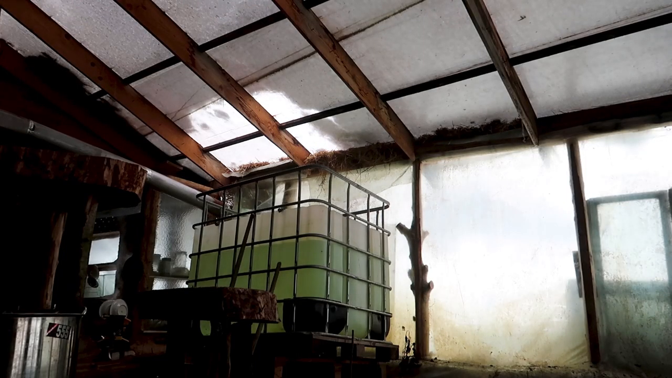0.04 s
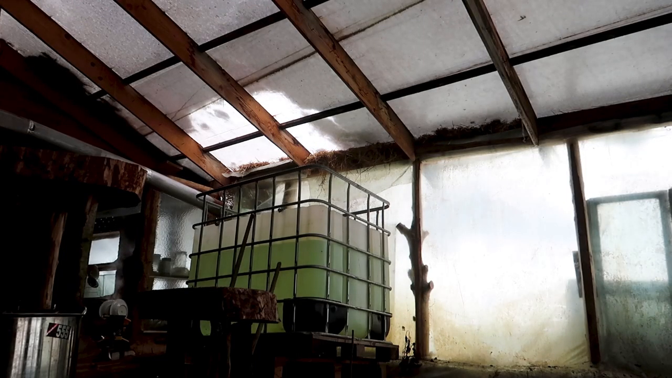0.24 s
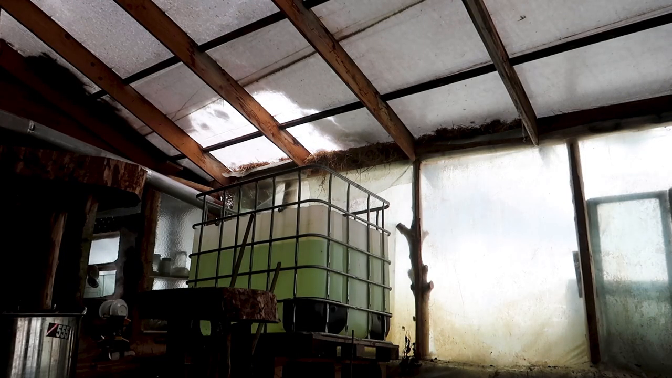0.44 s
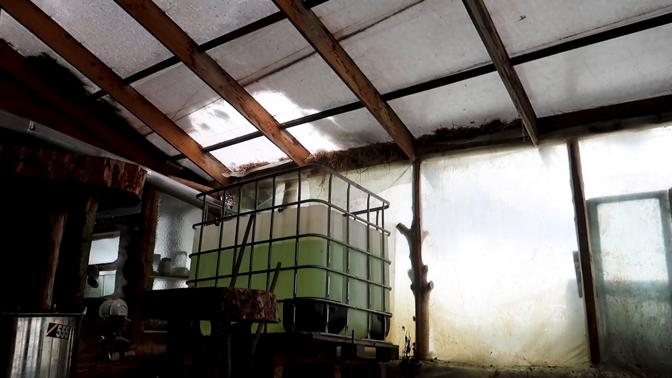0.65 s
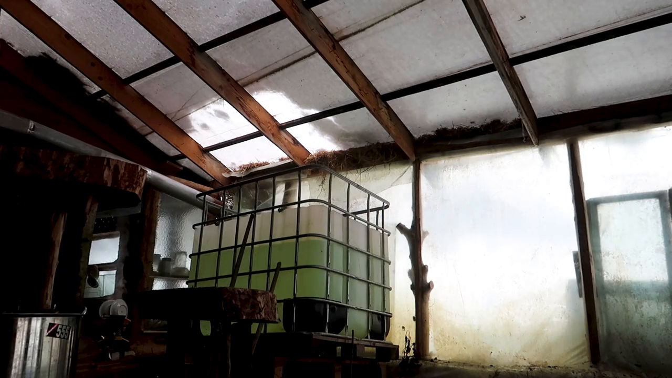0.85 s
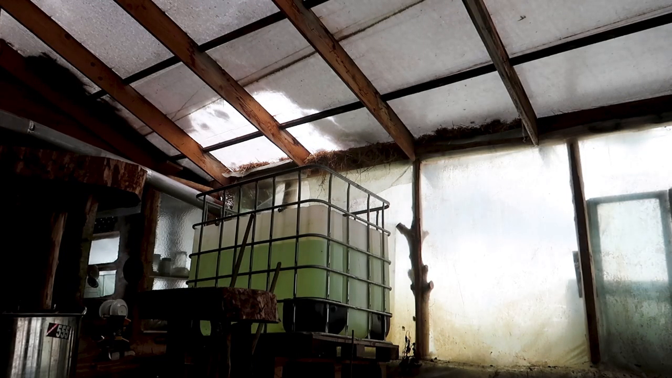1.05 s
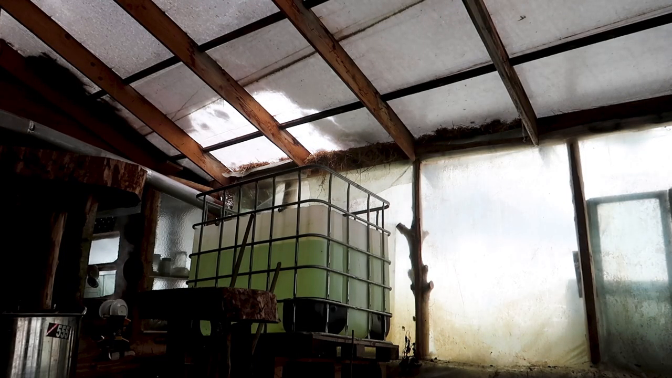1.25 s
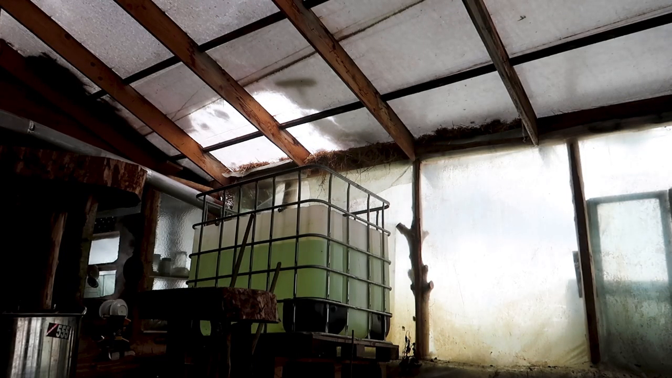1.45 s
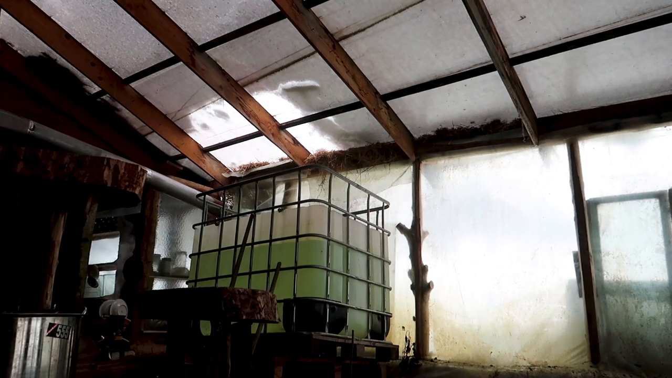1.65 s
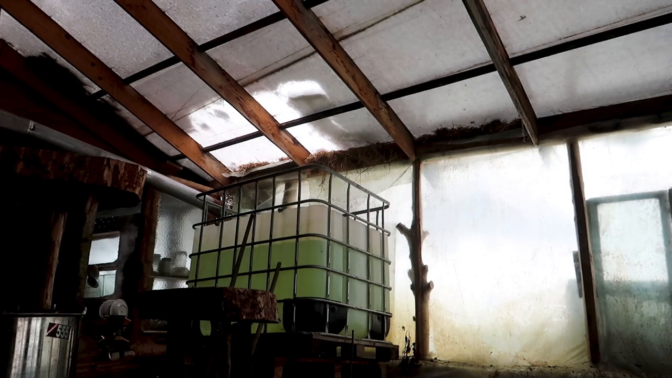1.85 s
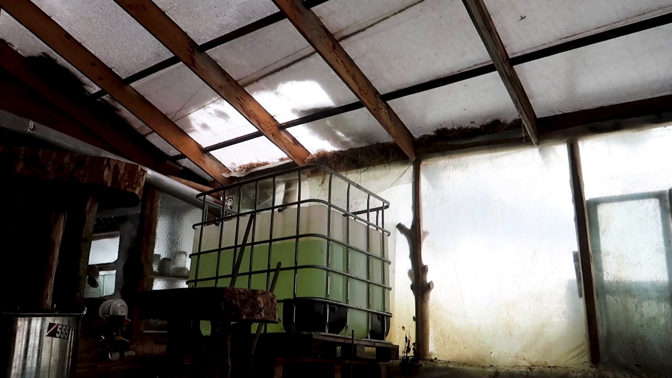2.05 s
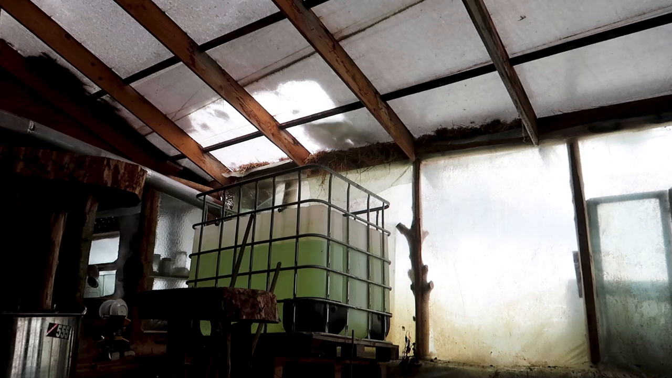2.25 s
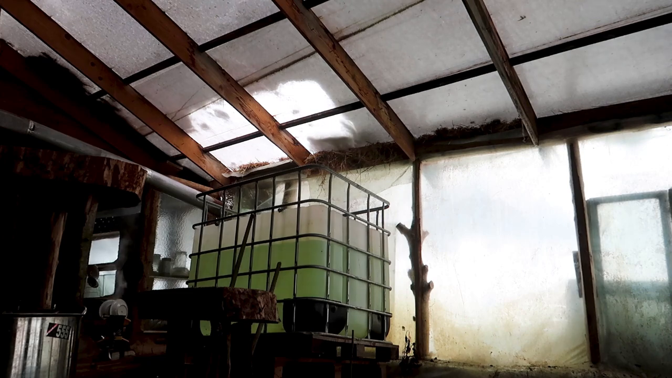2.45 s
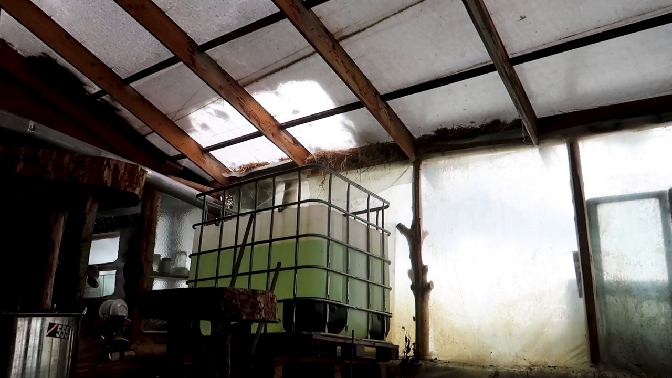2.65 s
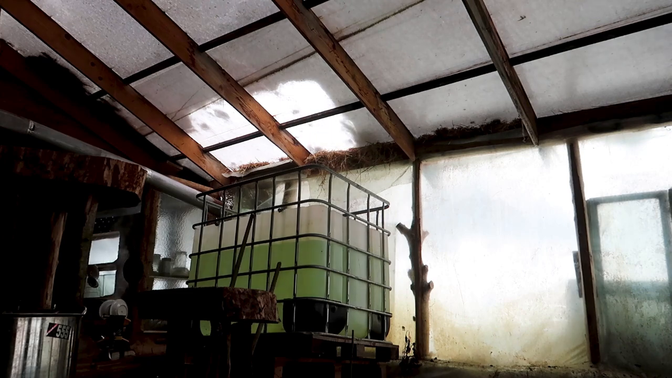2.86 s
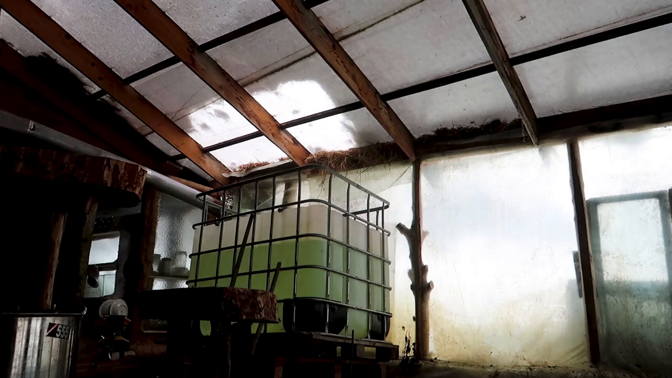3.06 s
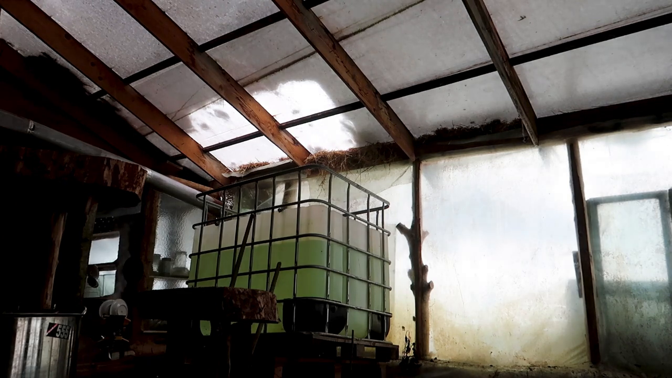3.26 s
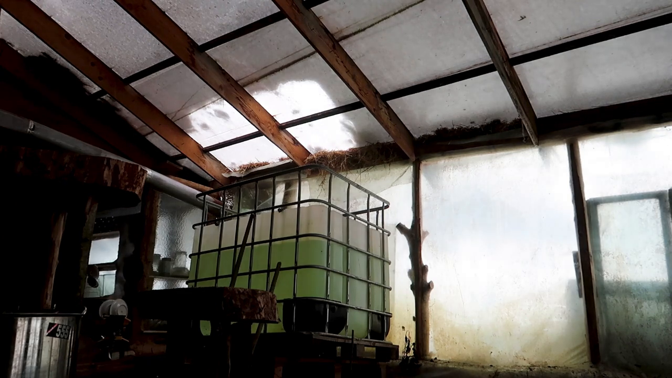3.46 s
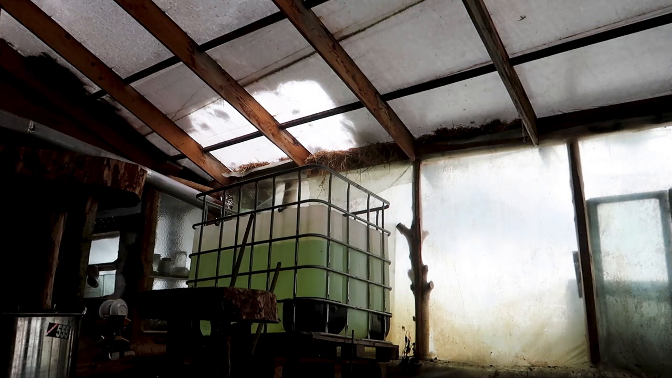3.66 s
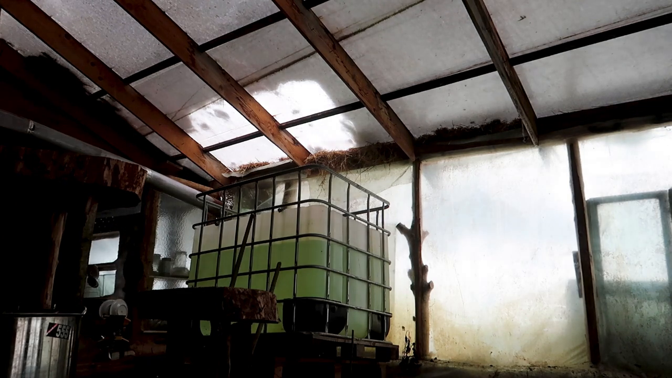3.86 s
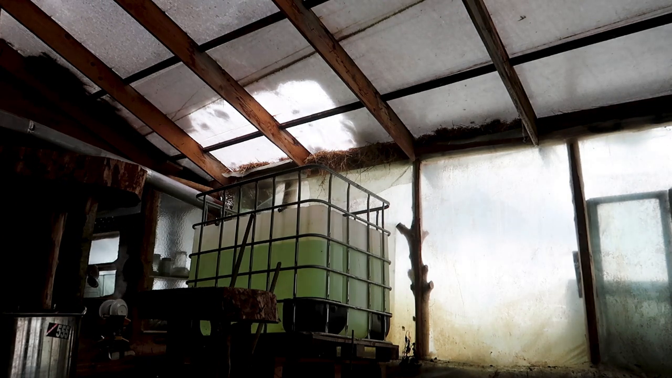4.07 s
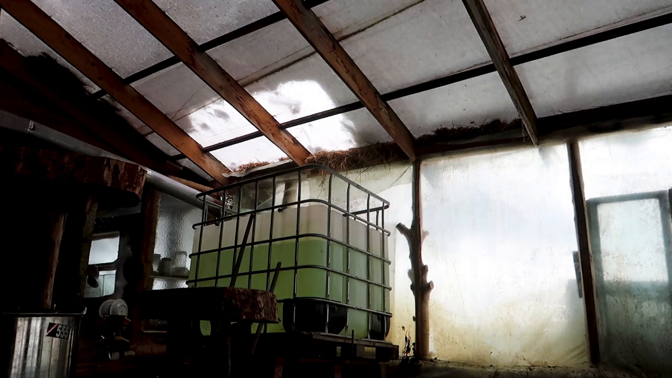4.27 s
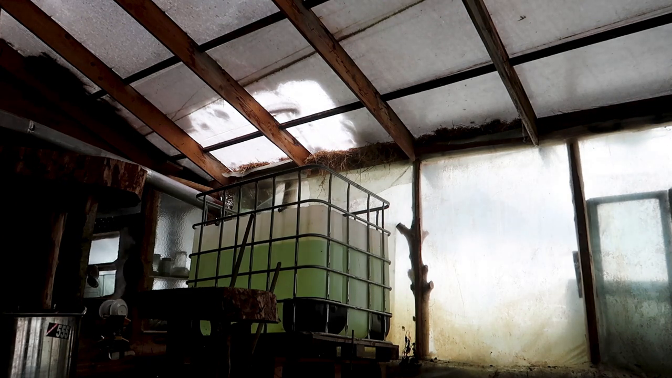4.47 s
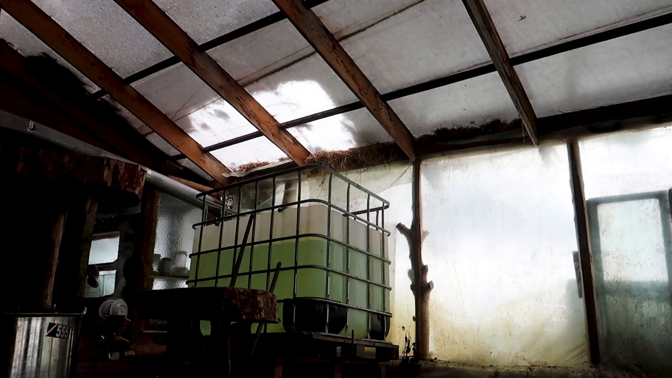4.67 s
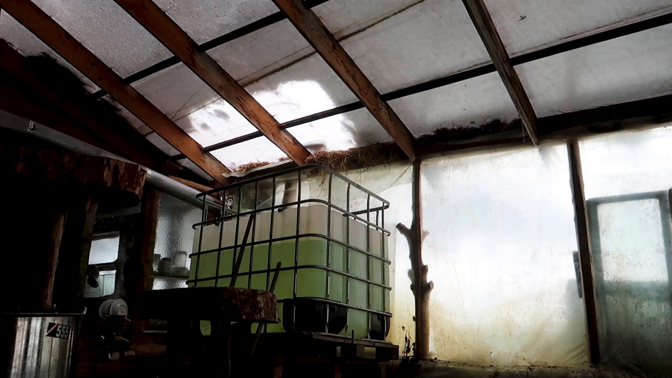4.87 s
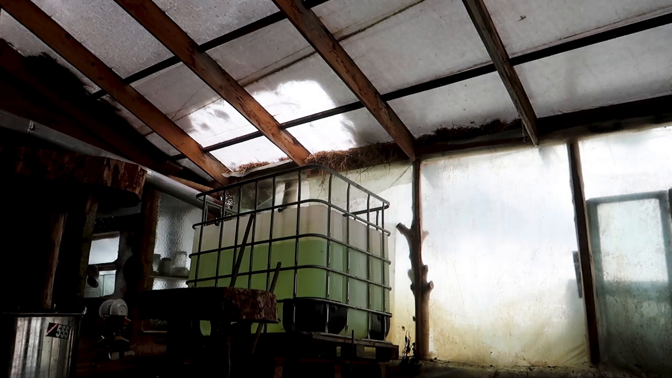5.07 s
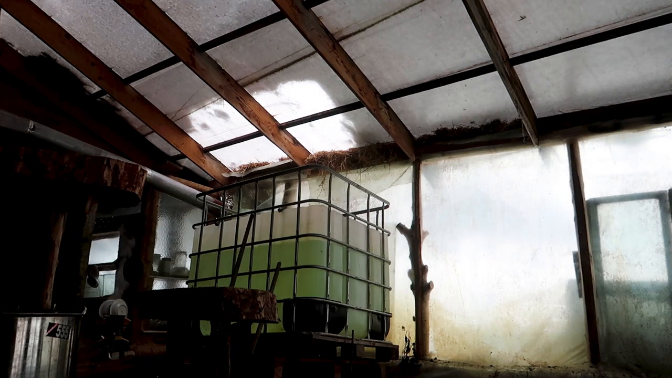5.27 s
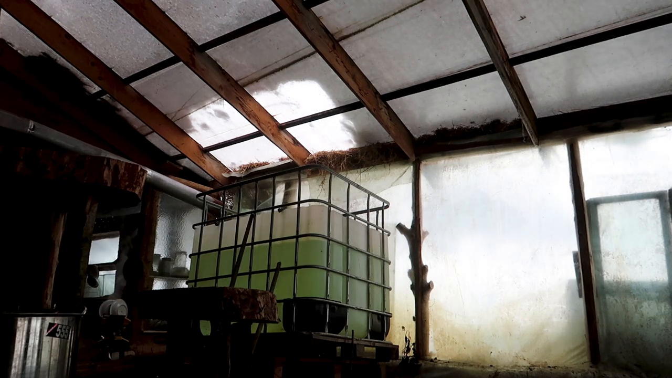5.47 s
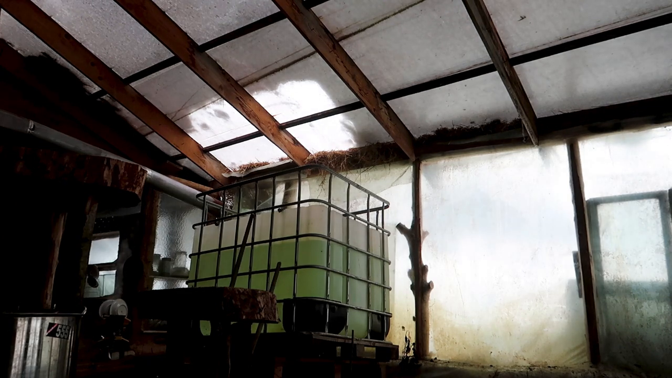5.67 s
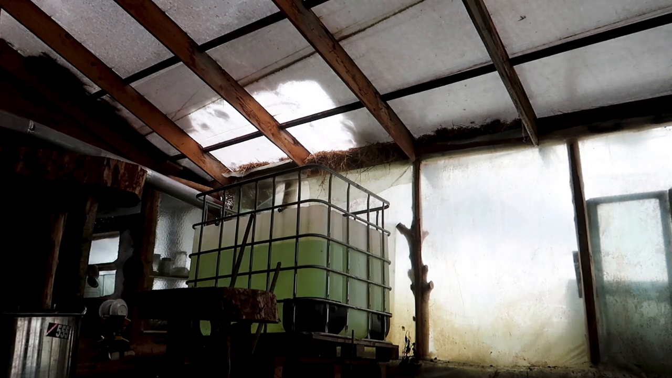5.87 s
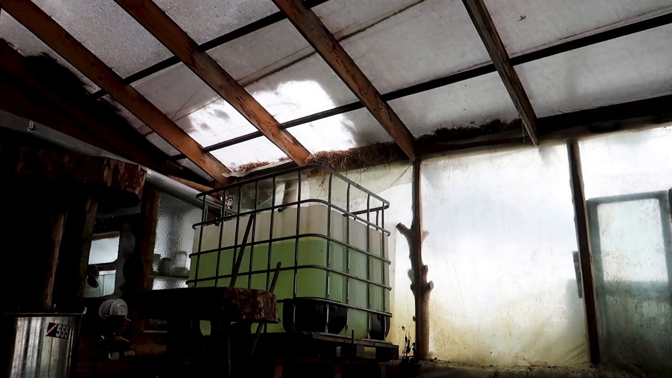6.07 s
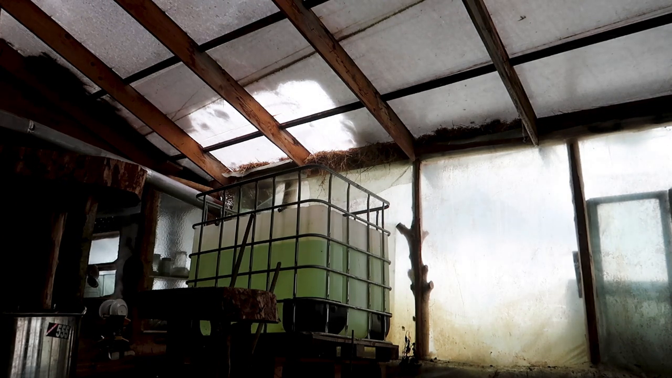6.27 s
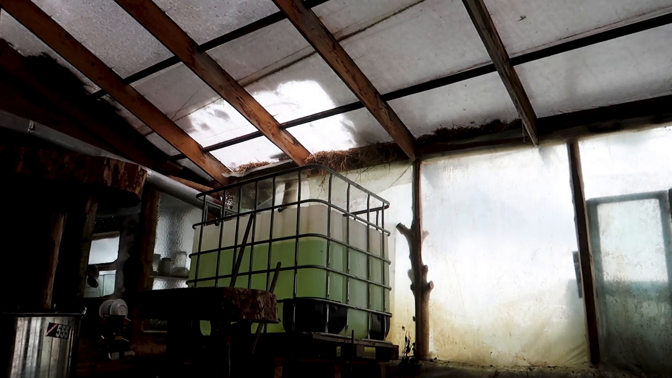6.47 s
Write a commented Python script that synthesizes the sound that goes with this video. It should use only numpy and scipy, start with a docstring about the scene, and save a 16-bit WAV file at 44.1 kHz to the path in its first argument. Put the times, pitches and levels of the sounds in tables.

```python
"""Inside a lean-to greenhouse, under a plastic roof from which snow is being knocked off.
A tool shoves the panels twice: they boom as decaying low swings, and the crust crunches in bursts of grains.
After each shove a slab hisses down the slope and tumbles off the eave: grains ring the panel's modes.
Around them come soft bumps, knocks, scrapes, faint rustles, a squeak and a groan, from filtered noise or slips.
The loose sheets drum low in slow swells of noise, over a quiet, steady winter air."""
import sys
import numpy as np
from scipy import signal
from scipy.fft import rfft, irfft
from scipy.io import wavfile
from scipy.ndimage import uniform_filter1d

SR = 44100
rng = np.random.default_rng(int(sys.argv[2]) if len(sys.argv) > 2 else 0)


def pcm_store(signal):
    """Save signal as 16-bit PCM."""
    levels = np.round(np.clip(np.atleast_2d(signal), -1, 1) * 32767)
    wavfile.write(sys.argv[1], SR, levels.astype(np.int16).T)


N = 287205
TIME, FREQS = np.arange(N) / SR, np.fft.rfftfreq(N, 1 / SR)

# flow of snow down the panels, one list for each of two slides: (time [s], reference level [dB])
FLOWS = [
    [(1.58, -64), (1.66, -44), (1.98, -33), (2.5, -32), (2.71, -28.5), (3.02, -36), (3.28, -37),
     (3.47, -48), (3.63, -64)],
    [(4.55, -57.5), (4.72, -50.5), (4.8, -47), (4.96, -50), (5.05, -31), (5.13, -35.5), (5.22, -36.5),
     (5.3, -41.5), (5.385, -36), (5.43, -40.5), (5.52, -38), (5.62, -39.5), (5.69, -37), (5.85, -45),
     (5.96, -64)],
]
# how each slide breaks into lumps: (start [s], length [s],
# powder before it, relative to the flow [dB], big lumps relative to the flow [dB])
BREAKUPS = [(2.55, 0.4, -8.5, -13), (4.961, 0.25, -1, -14)]
# slow swells of the loose sheets and the frame: (middle [s], length [s], sheets level [dB], frame level [dB])
SWELLS = [(0.424, 0.26, -49, -52.5), (0.896, 0.069, -52, -62), (1.95, 0.29, -71, -64),
          (3.74, 0.31, -50.5, -54), (3.962, 0.23, -51, -54.5), (4.737, 0.088, -56, -55),
          (5.146, 0.059, -40.5, -67), (6.152, 0.077, -48, -66), (6.342, 0.19, -49.5, -50.5)]


def amp(db):
    """Amplitude factor of a level in dB."""
    return 10 ** (np.asarray(db) / 20)


def unit(x):
    """Scales to rms 1."""
    return x / np.sqrt(np.mean(x ** 2) + 1e-20)


def read(points, hz=FREQS):
    """A table over frequency, joined on a log axis."""
    f, value = np.transpose(points)
    return np.interp(np.log(hz + 1), np.log(f + 1), value)


def level(tables, column):
    """Smoothed gain over time from tables of dB, silent outside them."""
    gain = 0
    for rows in tables:
        points = np.array(rows)
        gain = gain + amp(np.interp(TIME, points[:, 0], points[:, column], -150, -150))
    return uniform_filter1d(gain, size=500)


def colour(x, response):
    """Filters by a frequency response; rms 1."""
    return unit(irfft(rfft(x) * response, N))


def ring(x, response):
    """Lets a drive ring on through a response of unit mean power."""
    return irfft(rfft(x) * response / np.sqrt(np.mean(abs(response) ** 2)), N)


def grains(per_s, spread_db):
    """Two independent showers of tiny impacts of unequal size."""
    sizes = amp(spread_db * np.minimum(rng.exponential(1, (2, N)), 4))
    signs = rng.choice([-1, 1], (2, N))
    return sizes * signs * (rng.random((2, N)) < per_s / SR)


def waver(hz, depth_db):
    """A gain that wanders at random, up to about hz times a second."""
    return amp(depth_db * colour(rng.standard_normal(N), 1 / (1 + (FREQS / hz) ** 4)))


def clumpy(x, depth_db, frames, bins):
    """Lets every pitch region swell and fade on its own, as clumps catch and let go; rms 1."""
    z = signal.stft(x, nperseg=512, noverlap=384)[2]
    patches = uniform_filter1d(rng.standard_normal(z.shape[1:]), frames, axis=1)
    patches = unit(uniform_filter1d(patches, bins, axis=0))
    return unit(signal.istft(z * amp(depth_db * patches), nperseg=512, noverlap=384)[1][:, :N])


def burst(s, rise, decay):
    """Rises to 1 from time s, then dies away."""
    age = TIME - s
    return np.clip(age / rise, 0, 1) * np.exp(-np.maximum(age - rise, 0) / decay)


def swell(middle, length):
    """A smooth rise to 1 and fall."""
    return np.exp(-(2 * (TIME - middle) / length) ** 2)


def broken(s, length):
    """Share of a slide that has broken up, from 0 to 1."""
    return np.clip((TIME - s) / length, 0, 1)


def crumbling():
    """The part of the flow that has broken into pieces."""
    return sum(level([flow], column=1) * broken(s, length)
               for flow, (s, length, _, _) in zip(FLOWS, BREAKUPS))


def dull(hz):
    """Response of a soft contact that excites little above hz."""
    return 1 / (1 + (FREQS / hz) ** 6)


def resonance(hz, width):
    """Response of one mode, gain 1 at its centre."""
    return 1j * FREQS * width / (hz ** 2 - FREQS ** 2 + 1j * FREQS * width)


def modes(table):
    """Response of all the modes of one object."""
    return sum(amp(db) * resonance(hz, width) for hz, width, db in table)


def panel():
    """Response of the panels that the snow slides over."""
    # modes of the panels down the slope: (frequency [Hz], width [Hz], level [dB])
    slope_modes = [(93.4, 5.7, 9), (184.6, 8.1, 1), (198, 32, -3), (244.8, 15.6, 5.5), (297, 23, 3.5),
                   (346, 8, -24), (415, 14.7, -1.5), (476, 36, -3.5), (593.6, 15.5, 1), (670, 27, -5),
                   (813, 140, -7), (1054, 51, -19.5), (1110, 45, -16)]
    return modes(slope_modes)


def air():
    """Quiet, steady winter background: noise of one fixed colour."""
    # spectrum of the air: (frequency [Hz], relative level [dB])
    air_spectrum = [(12, -36), (20, -1), (38, -19.5), (60, -0.5), (80, -8.5), (104, -4.5), (121, 3.5),
                    (142, -6.5), (190, -5), (587, -14.5), (733, -13), (818, -20), (914, -14), (1080, -18),
                    (1240, -18.5), (3860, -25), (10500, -37), (13400, -44.5), (15000, -48)]
    return amp(-55) * colour(rng.standard_normal((2, N)), amp(read(air_spectrum)))


def band_bursts():
    """Short bursts of grains in one pitch band: scrapes, faint rustles, puffs of powder hiss, slide surges."""
    # bursts: (time [s], level [dB], length [s], pitch [Hz], width of the band filter applied twice [Hz])
    grain_bursts = [(-.01, -46.5, 0.048, 790, 1560), (0.295, -62, 0.06, 3400, 3000),
                    (1.552, -36.5, 0.07, 860, 900), (2.666, -38, 0.1, 593, 705),
                    (2.79, -34, 0.036, 560, 600), (2.827, -42, 0.061, 3000, 2600),
                    (5.007, -37, 0.066, 630, 600), (5.022, -35.5, 0.11, 2700, 2180),
                    (5.076, -39, 0.03, 880, 920), (5.14, -44.5, 0.21, 2650, 2560),
                    (5.366, -33, 0.059, 905, 990), (5.644, -30, 0.073, 800, 700),
                    (5.72, -36.5, 0.05, 950, 696), (6.307, -62, 0.04, 1500, 1800)]
    shower = grains(per_s=4000, spread_db=6.0)
    out = 0
    for s, db, length, hz, width in grain_bursts:
        band = colour(shower, resonance(hz, width) ** 2 * dull(5100))
        out = out + amp(db) * burst(s, length / 4, length / 2) * band
    return out


def drumming(under_flow_db=-13.5):
    """The loose sheets flex around their lowest note, in swells and under the moving snow."""
    # spectrum of the flexing sheets: (frequency [Hz], relative level [dB])
    sheet_spectrum = [(20, -43), (50, -3), (70, -25), (82, -3.5), (92, 11), (104, -4), (130, -20.5),
                      (260, -22), (450, -20), (1000, -56), (4000, -80)]
    flex = colour(rng.standard_normal((2, N)), amp(read(sheet_spectrum)))
    flex /= np.sqrt(uniform_filter1d(flex ** 2, size=3500) + 0.062)  # a steadier swing, so the drive sets its size
    swells = sum(amp(db) * swell(s, length) for s, length, db, _ in SWELLS)
    under_flow = amp(under_flow_db) * level(FLOWS, column=1)
    return np.hypot(swells, under_flow) * flex


def rumble():
    """The frame shudders, deep and dull: low noise in slow swells."""
    # spectrum of the frame: (frequency [Hz], relative level [dB])
    frame_spectrum = [(15, -18), (35, 0), (60, 14), (80, 1.5), (125, -30), (280, -8.5), (480, -37),
                      (1000, -36), (4000, -49)]
    swells = sum(amp(db) * swell(s, length) for s, length, _, db in SWELLS)
    return swells * colour(rng.standard_normal((2, N)), amp(read(frame_spectrum)))


def rustle(under_frame_db=-7):
    """The sheets crinkle faintly against the frame whenever it shudders: sparse grains ring the panel."""
    swells = sum(amp(frame_db) * swell(s, length) for s, length, _, frame_db in SWELLS)
    response = (resonance(300, 330) + 0.37 * panel()) * dull(1700)
    crinkles = colour(grains(per_s=350, spread_db=2.0), response)
    return amp(under_frame_db) * swells * crinkles


def bumps():
    """Soft bumps on the frame and lumps landing: dull blows that reach only the low modes of the roof."""
    # bumps: (time [s], level [dB], decay [s], highest pitch [Hz])
    soft_blows = [(.848, -48, 0.06, 690), (0.895, -47, 0.018, 700), (1.322, -40.5, 0.019, 980),
                  (1.367, -44.5, 0.035, 450), (4.284, -40.5, 0.031, 362), (5.824, -37.5, 0.038, 332),
                  (6.313, -43, 0.013, 520)]
    shake, body = rng.standard_normal((2, N)), panel() + 0.25 * resonance(130, 760)
    return sum(amp(db) * burst(s, 0.00075, decay) * colour(shake, body * dull(hz))
               for s, db, decay, hz in soft_blows)


def booms():
    """Low swings build up while the load pushes, then die away, wandering as the snow shifts."""
    # panels boom and the roof sways under a shove or a dropping slab:
    # (time [s], pitch [Hz], level [dB], rise [s], decay [s], unsteadiness [dB])
    sways = [(1.45, 86, -27.5, 0.039, 0.038, 0.9), (1.470, 29, -32.5, 0.052, 0.15, 3.5),
             (1.68, 12, -33.5, 0.099, 0.32, 1.7), (2.404, 91, -24, 0.048, 0.035, 0.2),
             (4.405, 84.6, -21.5, 0.048, 0.0345, .5), (4.41, 37, -31, 0.044, 0.11, 3.2),
             (5.813, 108, -39.5, 0.031, .025, 0.5)]
    shift, out = waver(hz=40, depth_db=1), 0
    for s, hz, db, rise, decay, unsteady_db in sways:
        wander = shift ** unsteady_db  # moves both pitch and size
        clock = np.cumsum(wander) / SR
        swing = np.sin(2 * np.pi * hz * (clock - np.interp(s, TIME, clock)))
        out = out + amp(db) * burst(s, rise, decay) * wander * swing
    return out


def crunches(ring_db=3):
    """Each blow cracks the frozen crust and sets the panel under it ringing."""
    # blows on the roof: (time [s], crunch level [dB], rise [s], decay [s],
    # panel rattle drive level [dB], highest rattle pitch [Hz])
    blows = [(1.453, -32.5, 0.0039, 0.039, -37.5, 220), (1.465, -35.5, 0.0077, 0.035, -48, 900),
             (1.548, -58, 0.014, 0.027, -36, 800), (1.569, -34.5, 0.006, 0.013, -44, 1800),
             (1.584, -41.5, 0.0057, 0.026, -41, 3300), (4.407, -32.5, 0.013, 0.019, -49, 200),
             (4.43, -29.5, 0.0053, 0.0093, -43, 900), (4.439, -31.5, 0.0047, 0.013, -24.5, 2200),
             (4.445, -41, 0.011, 0.029, -28, 336), (4.474, -45, 0.004, 0.042, -42, 2000)]
    # modes of the panel under the tool: (frequency [Hz], width [Hz], level [dB])
    struck_modes = [(185, 23, -2.5), (260, 58, -2), (330, 57, -4), (452, 28, -8.5), (657, 26, -13),
                    (790, 21, -6), (1100, 49, -8), (1294, 30, -5), (1407, 30, -6), (2020, 40, -1)]
    # spectrum of the cracking crust: (frequency [Hz], relative level [dB])
    crust_spectrum = [(100, -4), (250, -12.5), (350, -2.5), (560, -3.5), (800, -6.5), (950, -6),
                      (2000, -10), (3000, -10.5), (5100, -15), (5700, -18), (6900, -23), (8200, -33),
                      (11000, -42), (15000, -55)]
    body = modes(struck_modes)
    tone = amp(read(crust_spectrum)) * FREQS / (FREQS + 250)  # thinner in the bass
    crust = colour(grains(per_s=11000, spread_db=0.5), tone * (1 + amp(ring_db) * body))
    knocks = unit(grains(per_s=11000, spread_db=1.5))
    out = 0
    for s, db, rise, decay, rattle_db, hz in blows:
        blow = burst(s, rise, decay)
        out = out + amp(db) * blow * crust
        out = out + amp(rattle_db) * ring(blow * knocks, body * dull(hz))
    return out


def slides(ringing=2.05, slab_db=1.0, powder_db=3.5, dulling=0.29, dulling_hz=1800):
    """The grinding slab rings the panel's modes in small surges; loose powder hisses over it, then thins."""
    # spectra of the slab and of the powder: (frequency [Hz], relative level [dB])
    slab_spectrum = [(150, -50), (350, -2), (520, -0.5), (800, -3.5), (1100, -1), (1600, -3.5), (2400, -6),
                     (3300, -11), (4600, -16), (5600, -21.5), (6700, -25.5), (8000, -54), (15000, -108)]
    powder_spectrum = [(600, -6), (1500, 1.5), (2600, 4.5), (3600, 0.5), (4700, 2), (5600, -5),
                       (6700, -3.5), (7600, -13.5), (9300, -18.5), (11000, -29.5), (15000, -35)]
    spent_db = -27.5  # powder left once broken up, relative to the flow
    slab_tone = amp(read(slab_spectrum)) * (1 + ringing * panel())
    slab = colour(grains(per_s=6000, spread_db=1.0), slab_tone) * waver(hz=45, depth_db=0.52)
    powder = colour(grains(per_s=12000, spread_db=3.0), amp(read(powder_spectrum)))
    powder = powder * waver(hz=25, depth_db=0.76)
    slab = clumpy(slab, depth_db=1.9, frames=10, bins=3)
    powder = clumpy(powder, depth_db=1.6, frames=8, bins=5)
    treble = irfft(rfft(slab) * (1 - dull(dulling_hz)), N)
    grinding = level(FLOWS, column=1) * slab - dulling * crumbling() * treble  # broken snow grinds more dully
    loose = 0
    for flow, (s, length, db, _) in zip(FLOWS, BREAKUPS):
        thinning_db = db + (spent_db - db) * broken(s, length)
        loose = loose + level([flow], column=1) * amp(thinning_db)
    return amp(slab_db) * grinding + amp(powder_db) * loose * powder


def lumps(split_hz=275, mode_width_hz=48, small_db=-9.5):
    """Tumbling lumps drum on the panel: big ones reach low modes, small ones higher; each clump has a note."""
    # heavy clumps roll over the eave: (middle [s], length [s], big lumps level [dB],
    # small lumps level [dB], mode brought out [Hz], level of that mode [dB])
    clumps = [(2.4, 0.27, -37.5, -41.5, 486, -40), (2.603, 0.26, -38.5, -40, 239, -38.5),
              (2.698, 0.12, -55, -42, 426, -32.5), (2.8, 0.054, -48, -43, 586, -30.5),
              (2.825, 0.053, -52, -55, 307, -35.5), (2.983, 0.24, -39.5, -39, 298, -40),
              (3.187, 0.17, -42.5, -41.5, 494, -38.5), (3.23, 0.064, -52, -40, 601, -39.5),
              (5.482, 0.36, -51.5, -66, 310, -45)]
    # colour of a lump's soft impact: (frequency [Hz], relative level [dB])
    impact_spectrum = [(50, -43), (120, -16), (170, -2), (300, -1), (480, -2), (700, -6.5), (1500, -9),
                       (4000, -34), (15000, -65)]
    response = panel() * amp(read(impact_spectrum))
    big = colour(grains(per_s=980, spread_db=3.0), response * dull(split_hz))
    small = colour(grains(per_s=700, spread_db=2.5), response * (1 - dull(split_hz)))
    taps = grains(per_s=400, spread_db=2.5)
    big_clumps, small_clumps, notes = 0, 0, 0
    for s, length, big_clump_db, small_clump_db, hz, note_db in clumps:
        pass_by = swell(s, length)
        big_clumps = big_clumps + amp(big_clump_db) * pass_by
        small_clumps = small_clumps + amp(small_clump_db) * pass_by
        notes = notes + amp(note_db) * pass_by * colour(taps, resonance(hz, mode_width_hz) ** 2)
    rolling = sum(level([flow], column=1) * amp(db) for flow, (_, _, _, db) in zip(FLOWS, BREAKUPS))
    big_drive = np.hypot(big_clumps, rolling)
    small_drive = np.hypot(small_clumps, amp(small_db) * crumbling())
    return big_drive * big + small_drive * small + notes


def clods(decay=0.0013, ring_db=2, crumbs_db=-10):
    """Frozen clods knock on the panel one by one; smaller crumbs patter at random as a slide breaks up."""
    # knocks: (time [s], level of the blow before the panel rings [dB])
    clod_knocks = [(2.303, -33), (2.495, -36), (2.975, -24), (3.374, -36), (5.088, -22), (5.125, -30),
                   (5.256, -36), (5.389, -32), (5.598, -43), (5.699, -24), (5.812, -27.5)]
    response = resonance(930, 690) * dull(2400) * (1 + amp(ring_db) * panel())
    hits = sum(amp(db) * burst(s, 0.00052, decay) for s, db in clod_knocks)
    knocks = hits * rng.standard_normal((2, N))
    patter = unit(grains(per_s=130, spread_db=2.0))
    return ring(knocks + amp(crumbs_db) * crumbling() * patter, response)


def squeak():
    """Packed snow squeaks once against the plastic as the second slab lets go: slips ring high modes."""
    # modes of the squeak: (frequency [Hz], width [Hz], level [dB])
    squeak_modes = [(1940, 40, -4), (2165, 57, 1.5), (2320, 50, -2), (2520, 56, -8), (2720, 80, -6)]
    slips = unit(grains(per_s=7000, spread_db=1.2))
    rub = slips * burst(4.737, rise=0.006, decay=0.019)  # seconds
    return amp(-34) * ring(rub, modes(squeak_modes) * dull(3420) * (1 - dull(1880)))


def chatter():
    """Quickening, uneven stick and slip: a short groan whose overtones sweep through the panel's modes."""
    # a slab gathers speed and chatters: (time [s], slip rate [1/s], level [dB])
    slip_rates = [(4.759, 110, -69), (4.816, 125, -44), (4.871, 134, -43.5), (4.921, 142, -42),
                  (4.98, 150, -56)]
    s, rate, db = np.transpose(slip_rates)
    turns = np.cumsum(np.interp(TIME, s, rate) * waver(hz=70, depth_db=.22)) / SR
    overtones = sum(np.cos(2 * np.pi * k * turns + k * k) / np.sqrt(k) for k in range(1, 9))
    slips = overtones * waver(hz=60, depth_db=3)
    groan = colour(slips, panel() + 0.26 * resonance(360, 900))
    return amp(np.interp(TIME, s, db, -150, -150)) * groan


def shed(x, wet_db, t60):
    """Dense short reflections from the walls and floor scatter the treble."""
    t = TIME[:SR // 2]
    taps = rng.standard_normal((2, len(t))) * (rng.random((2, len(t))) < .05)
    taps = taps * (t > .002) * amp(-60 * t / t60)
    highpass = signal.butter(2, 600, "high", fs=SR, output="sos")
    taps = signal.sosfilt(highpass, unit(taps) / np.sqrt(len(t)))
    wet = signal.fftconvolve(x, taps, axes=1)[:, :N]
    return (x + amp(wet_db) * wet) / np.hypot(1, amp(wet_db))


def ports(pair, same, phase=0, balance_db=0):
    """Blends two independent signals into left and right, keeping the colour of their sum."""
    a, b = rfft(pair)
    same = np.clip(same, -.9995, .9995)
    left, shared, own = amp(balance_db), same * np.exp(-1j * phase), np.sqrt(1 - same ** 2)
    middle = np.sqrt(abs(left + shared) ** 2 + own ** 2) / 2
    return irfft(np.array([left * a, shared * a + own * b]) / middle, N)


def scene():
    """Snow sounds come from the roof, a little to the right; the deepest sounds reach both ports alike."""
    # likeness of the two microphone ports, for the roof and for the air: (frequency [Hz], correlation [-1 to 1])
    roof_same = [(150, .999), (400, .98), (700, .98), (1500, .87), (2600, .78), (4400, .4), (6000, .4),
                 (9000, .55), (11000, .8), (15000, .5)]
    air_same = [(60, .999), (150, .97), (300, .85), (500, .55), (900, .1), (1500, -.15), (5000, -.15),
                (15000, 0)]
    # roof sound at the ports: (frequency [Hz], left leads by [rad])
    roof_phase = [(700, 0), (2200, -.3), (3200, -.6), (3900, -1.2), (4700, -1.2), (5400, -2.1),
                  (7600, -2.8), (11000, -3.1)]
    # roof sound at the ports: (frequency [Hz], left minus right [dB])
    roof_balance = [(150, 0), (700, -.9), (1100, -2.2), (1500, -2.4), (3000, -1.7), (6000, -.6),
                    (14900, .2)]
    snow = shed(crunches() + slides() + band_bursts() + clods() + squeak(), wet_db=-9, t60=.18)
    roof = snow + lumps() + bumps() + rustle()
    roof = ports(roof, read(roof_same), read(roof_phase), read(roof_balance))
    deep = ports(drumming() + rumble(), read(roof_same)) + booms() + chatter()
    return roof + deep + ports(air(), read(air_same))


def record(dry):
    """The recorder's band limit: a steep low-pass at 15050 Hz."""
    lowpass = signal.firwin(511, 15050, window=("kaiser", 9), fs=SR)
    return signal.oaconvolve(dry, lowpass[None], "same")


dry = scene()
out = record(dry)
pcm_store(out)
```